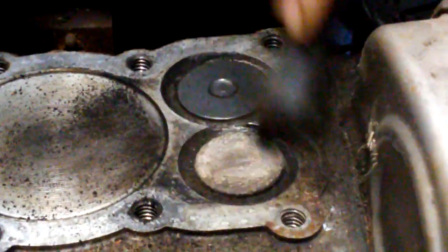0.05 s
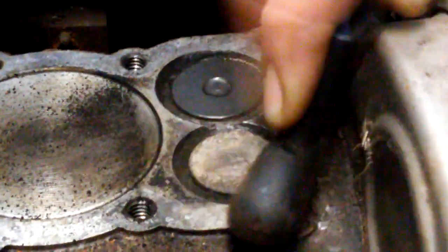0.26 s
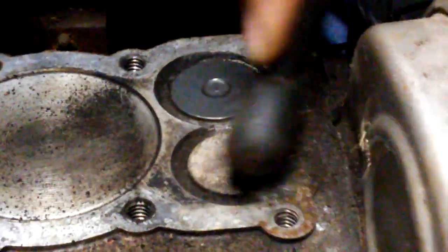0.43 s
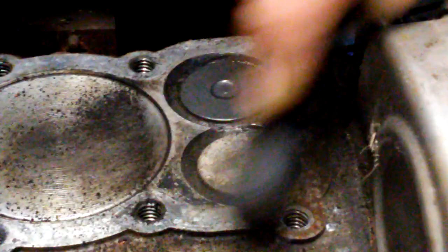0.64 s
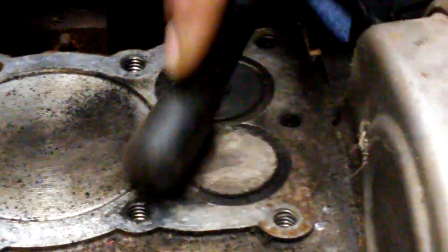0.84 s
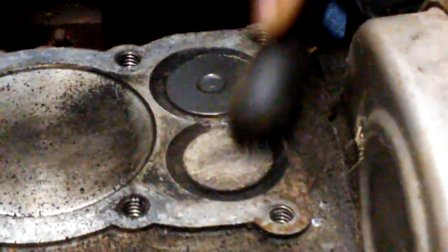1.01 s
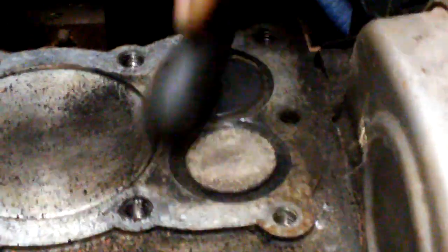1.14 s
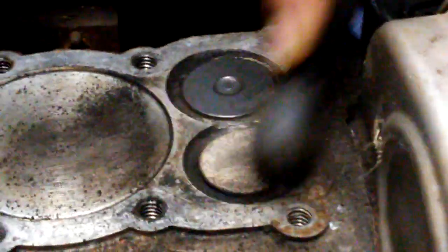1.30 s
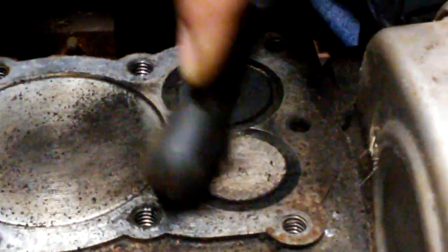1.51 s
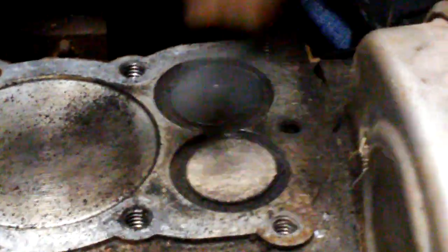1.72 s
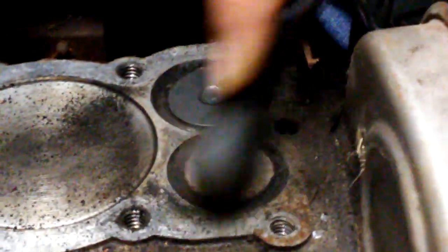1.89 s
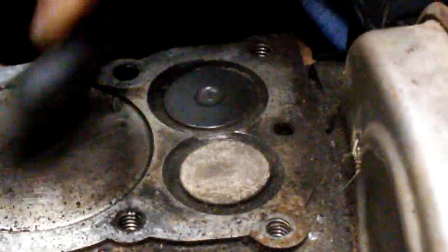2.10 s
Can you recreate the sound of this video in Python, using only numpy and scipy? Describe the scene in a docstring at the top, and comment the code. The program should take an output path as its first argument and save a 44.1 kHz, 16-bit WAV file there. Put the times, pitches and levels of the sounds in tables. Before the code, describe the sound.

Wire bristles scratch unevenly over a metal engine part, knocking against it once early on.

```python
"""In a garage, a small wire brush scrubs carbon off a cylinder head in quick, uneven strokes.
The bristles catch and slip, making a dense scratch that rings the wires and the metal under them.
Early on, the brush head knocks hard against the metal casting, which rings briefly.
Now and then a single wire flicks free. Later a faint low hum swells and fades in the quiet air."""
import sys
import numpy as np
from scipy import signal
from scipy.fft import rfft, irfft
from scipy.io import wavfile

SR = 44100
rng = np.random.default_rng(int(sys.argv[2]) if len(sys.argv) > 2 else 0)


def file_out(sig):
    """Save sig as 16-bit WAV at sys.argv[1]."""
    # one column per channel
    cols = np.atleast_2d(sig).T
    # limit, then scale
    lim = np.clip(cols, -1, 1)
    pcm = np.round(lim * 32767).astype(np.int16)
    wavfile.write(sys.argv[1], SR, pcm)


N = 94815
T = np.arange(N) / SR
CUTOFF_HZ = 15750

# Brush strokes; rise and fall cover the 10 dB nearest the peak:
# (peak time [s], level [dB], rise [s], fall [s], relative tuft level [dB], tuft pitch [Hz])
BRUSH_STROKES = [(.008, -55.5, 0.042, 0.045, 8, 3135), (0.06, -51.5, 0.023, 0.033, -2, 3240),
                 (0.141, -54.5, 0.053, 0.029, 3, 3330), (0.206, -49, 0.027, 0.039, -8, 2960),
                 (.315, -57, .06, 0.059, -1.5, 3843), (.448, -57, 0.016, 0.028, -8, 3070),
                 (0.481, -61, .02, 0.037, -2.5, 2890), (.63, -64.5, 0.043, 0.05, -1.5, 2957),
                 (.758, -65.5, 0.0097, 0.046, -7, 3086), (.795, -64, 0.029, 0.026, -4, 3194),
                 (.946, -58, 0.028, 0.046, 0.5, 3145), (1.006, -67.5, 0.027, 0.052, -7, 3170),
                 (1.042, -60.5, 0.015, 0.038, -10, 3150), (1.114, -64, 0.023, 0.039, -1.5, 3210),
                 (1.169, -57.5, 0.0084, 0.021, -5, 3130), (1.259, -56.5, 0.048, 0.046, -3.5, 3130),
                 (1.393, -59, 0.013, 0.036, -8, 3090), (1.45, -66, .025, 0.038, -7, 3074),
                 (1.571, -53.5, 0.033, 0.054, -3.5, 3120), (1.688, -58.5, 0.019, 0.034, -12, 2940),
                 (1.739, -62, 0.027, 0.048, 0.5, 3070), (1.804, -58, 0.019, 0.015, -2.5, 3100),
                 (1.876, -56, 0.032, 0.046, -3.5, 3196), (2.129, -58.5, 0.033, 0.025, -4.5, 3100)]
# Tone of the scratching wire tips: (frequency [Hz], relative level [dB])
SCRATCH_TONE = [(1500, -29.5), (3900, -2), (4800, -12.5), (5400, -2.5), (6200, -1), (7300, 2), (8300, -5.5),
                (8900, -9), (10300, -7), (12000, -8), (15500, -4)]
# Rings that the bristles stir in the metal: (pitch [Hz], width [Hz], relative level [dB])
METAL_RINGS = [(1977, 67, -3.5), (2055, 34, -5), (2646, 90, -6.5), (3000, 90, 0.5), (3158, 130, -6),
               (3495, 70, -2), (4198, 110, -2.5), (6020, 110, -5.5)]
# Tone of the rubbed casting: (frequency [Hz], relative level [dB])
RUB_TONE = [(30, -24.5), (65, -18), (100, -1), (135, -1.5), (170, -8), (215, 3.5), (290, -4), (400, -8),
            (490, -1.5), (610, -10), (700, -5), (920, -12), (1100, -5.5), (1210, 3), (1330, -5.5),
            (1510, -11), (1970, -6.5), (2400, -18.5)]
# Tone of the still garage air: (frequency [Hz], relative level [dB])
AIR_TONE = [(25, -2.5), (60, 3.5), (120, -10.5), (300, -12.5), (1000, -23), (4000, -14.5), (15000, -25.5)]
# The brush head hits and bounces: (time [s], relative level [dB])
HITS = [(0.2162, -9), (0.2177, 4), (0.2208, 0.5), (0.2225, -8), (0.2267, -12), (0.2432, -19.5)]
# Notes of the struck casting: (pitch [Hz], relative level [dB], time to fade 60 dB [s])
CASTING_NOTES = [(203, -35, .34), (272, -33, .24), (321, -24, .13), (372, -27, .08), (477, -36, .25),
                 (541, -31, .17), (594, -37, .16), (698, -34, .17), (1212, -30, .14), (1504, -39, .14),
                 (1812, -30, .15), (1989, -27, .11), (2127, -31, .12), (2393, -28, .12), (2486, -28, .12),
                 (2659, -34, .16), (2773, -30, .09), (2945, -30, .09), (3008, -34, .17), (3454, -28, .09)]
# Tone of each hit's clatter: (frequency [Hz], relative level [dB])
CLATTER_TONE = [(40, -26.5), (150, -26.5), (340, 8.5), (430, -10), (560, -4), (830, -12), (1020, -17),
                (1210, -3), (1380, -11), (1500, -6.5), (1680, -13.5), (2060, 2), (2250, -9), (2550, 0.5),
                (2900, -10.5), (3300, -14), (4400, -15.5), (5200, -14), (8500, -36.5), (15500, -36.5)]
# Bands of lingering clatter: (frequency [Hz], gain [dB], time to fade 60 dB [s])
TAIL_BANDS = [(247, -36, .24), (920, -31, 0.33), (2500, -34, 0.34), (5930, -30.5, .22), (12000, -34.5, 0.1)]
# Single wires flicking free: (time [s], level [dB], pitch [Hz])
WIRE_FLICKS = [(.327, -49.5, 4570), (0.509, -64.5, 7280), (0.7506, -61.5, 6750), (1.163, -58, 3110),
               (1.233, -53, 2990), (1.866, -52.5, 3160), (2.125, -59.5, 2960)]


def from_db(db):
    """Turn decibels into a number to multiply by."""
    return 10 ** (np.asarray(db) / 20)


def rms_one(x):
    """Scale a sound so that its average strength (rms) is 1."""
    return x / np.sqrt(np.mean(x ** 2) + 1e-20)


def colour(x, tone):
    """Shape a steady sound with a tone table; strength 1."""
    hz, db = np.transpose(tone)
    bin_hz = np.maximum(np.arange(N // 2 + 1) * SR / N, 1)
    gains = from_db(np.interp(np.log(bin_hz), np.log(hz), db))
    return rms_one(irfft(rfft(x) * gains, N))


def drift(rate_hz):
    """A smooth random wobble of strength 1."""
    r = np.exp(-2 * np.pi * rate_hz / SR)
    return rms_one(signal.lfilter([1], [1, -2 * r, r * r], rng.standard_normal(N + SR))[SR:])


def resonance(x, hz, width_hz):
    """Keep the part of a sound near one pitch, so that it rings."""
    r = np.exp(-np.pi * width_hz / SR)
    feedback = [1, -2 * r * np.cos(2 * np.pi * hz / SR), r * r]
    return signal.lfilter(np.array([1, 0, -1]) * (1 - r * r) / 2, feedback, x)


def ring(x, hz, width_hz):
    """Two resonances in a row for a clearer pitch; strength 1."""
    return rms_one(resonance(resonance(x, hz, width_hz), hz, width_hz))


def rasp(hz, width_hz):
    """Noise gathered around one pitch."""
    return ring(rng.standard_normal(N), hz, width_hz)


def decay(start, fade_s):
    """Jump to 1 at the start, then lose 60 dB every fade_s seconds."""
    return (T >= start) * np.exp(-np.log(1000) * np.maximum(T - start, 0) / fade_s)


def slips(per_second=7100, spread_db=0.5, catch_db=1.5):
    """Wire tips slip with tiny clicks, louder and softer as tufts catch and let go."""
    slipping = rng.random(N) < per_second / SR
    click_db = spread_db * np.minimum(rng.exponential(1, N), 5)
    click_db += catch_db * drift(rate_hz=270)
    return slipping * from_db(click_db) * rng.choice([-1, 1], N)


def pressure(peak_s, db, rise, fall):
    """One stroke presses harder, then eases off."""
    away = np.where(T < peak_s, (peak_s - T) / rise, (T - peak_s) / fall)
    return from_db(db - 10 * np.minimum(away, 10) ** 1.5)  # power 1 is pointed, 2 is rounded


def metal_rings(plucks, wander_db=3):
    """Each ring in the metal answers more or less as the brush moves over it."""
    rings = 0
    for hz, width, db in METAL_RINGS:
        note = rms_one(resonance(resonance(plucks, hz, width), hz, 4 * width))
        rings += from_db(db + wander_db * drift(rate_hz=3)) * note
    return rms_one(rings)


def brush():
    """Slipping bristles scratch, rub the casting and ring the tuft at each stroke's own pitch."""
    clicks, plucks = slips(), slips()
    power, tuft = 0, 0
    for peak_s, db, rise, fall, tuft_db, hz in BRUSH_STROKES:
        stroke = pressure(peak_s, db, rise, fall)
        power += stroke ** 2
        tuft += from_db(tuft_db - 3) * stroke * ring(rng.permutation(plucks), hz, width_hz=470)
    press = np.sqrt(power)
    scratch = colour(clicks, SCRATCH_TONE)
    metal = from_db(-6.5) * metal_rings(plucks)
    rub_swell = (press / from_db(-60)) ** 0.72  # the rub swells less than the scratch
    rub = from_db(-69.5) * rub_swell * colour(clicks, RUB_TONE)
    return press * (scratch + metal) + tuft + rub


def garage_echo(x):
    """The garage sends back a short blur of echoes."""
    echoes = rng.standard_normal(N) * decay(0.0029, fade_s=0.083)
    return from_db(-12) * signal.fftconvolve(x, echoes / np.linalg.norm(echoes))[:N]


def garage_air():
    """Still air makes a very soft, steady noise."""
    return from_db(-88) * colour(rng.standard_normal(N), AIR_TONE)


def skid(hit_s, swell_s=0.0079):
    """The brush head skids, swelling quickly up to the hit."""
    swell = (T < hit_s) * np.exp(-np.abs(T - hit_s) / swell_s)
    return from_db(-40) * swell * rasp(3100, width_hz=1500)


def hits(fade_s):
    """Loudness of the bouncing brush head: each hit jumps up and dies away."""
    return np.sqrt(sum((from_db(db) * decay(start, fade_s)) ** 2 for start, db in HITS))


def casting_ring():
    """The struck casting rings with many notes, each fading at its own speed."""
    notes = 0
    for hz, db, fade_s in CASTING_NOTES:
        wave = np.sin(2 * np.pi * (hz * T + rng.random()))
        notes += from_db(db - 0.5) / 2 * hits(fade_s) * wave
    return notes


def clatter_tail(start):
    """Clatter lingers in the casting and garage; the highest band dies first."""
    centres = np.array(TAIL_BANDS)[:, 0]
    edges = [30, *np.sqrt(centres[1:] * centres[:-1]), CUTOFF_HZ]
    tail = 0
    for (_, db, fade_s), low, high in zip(TAIL_BANDS, edges, edges[1:]):
        band = signal.butter(3, [low, high], "band", fs=SR, output="sos")
        clatter = colour(rng.standard_normal(N), CLATTER_TONE)
        tail += from_db(db) * decay(start, fade_s) * signal.sosfilt(band, clatter)
    return tail


def knock(damp_from_s=0.39, damp_db_per_s=111.5):
    """The brush head skids in and strikes the casting, then bears down and damps the ring."""
    start = HITS[0][0]
    damping = from_db(-damp_db_per_s * np.maximum(T - damp_from_s, 0))
    ringing = damping * (casting_ring() + clatter_tail(start))
    crack = from_db(-31) * decay(start, fade_s=0.007) * rng.standard_normal(N)
    clatter = from_db(-26) * hits(fade_s=0.038) * colour(rng.standard_normal(N), CLATTER_TONE)
    dull_blow = from_db(-29) * hits(fade_s=0.01) * rasp(560, width_hz=550)
    thud = from_db(-58) * decay(start, fade_s=0.16) * rasp(65, width_hz=130)
    bass_cut = signal.butter(4, 190, "high", fs=SR, output="sos")  # the metal gives off little bass
    return signal.sosfilt(bass_cut, skid(start) + crack + clatter + dull_blow + ringing) + thud


def flicks():
    """Single wires spring off an edge with short ticks."""
    return sum(from_db(db) * decay(start, fade_s=0.03) * rasp(hz, width_hz=610)
               for start, db, hz in WIRE_FLICKS)


def hum(hz=149, peak_s=1.546, swell_s=0.28):
    """A faint low hum swells and fades."""
    swell = np.exp(-((T - peak_s) / swell_s) ** 2)
    return from_db(-77) * swell * np.sin(2 * np.pi * hz * T)


def scene():
    """Mix the scrubbing, its echo, the air, the knock and the hum into one channel."""
    scrub = brush() + flicks()
    return (scrub + garage_echo(scrub) + garage_air() + knock() + hum())[None]


def record(dry):
    """Cut off the very highest treble steeply."""
    return signal.sosfilt(signal.ellip(12, .1, 70, CUTOFF_HZ, fs=SR, output="sos"), dry)


dry = scene()
out = record(dry)
file_out(out)
```